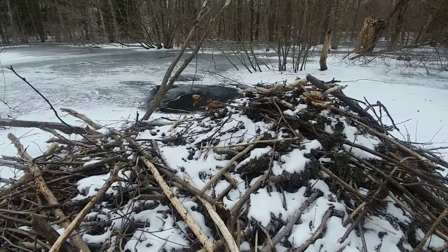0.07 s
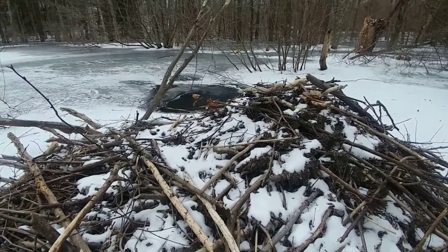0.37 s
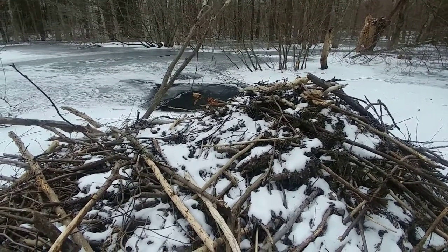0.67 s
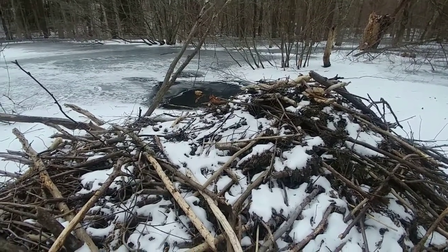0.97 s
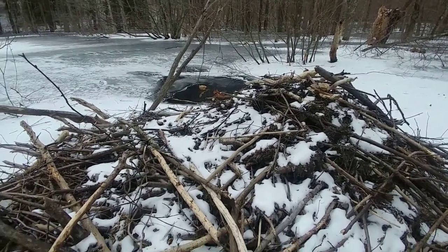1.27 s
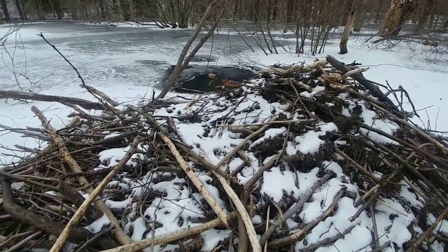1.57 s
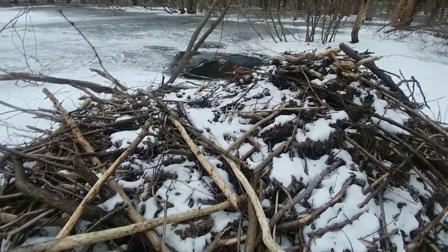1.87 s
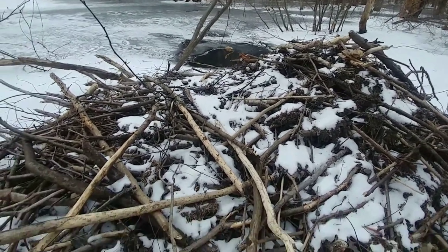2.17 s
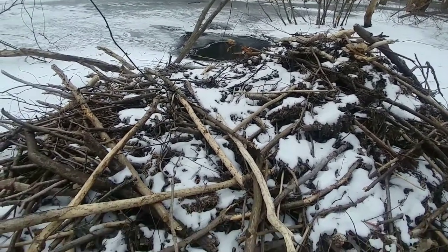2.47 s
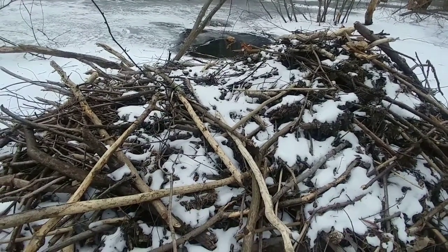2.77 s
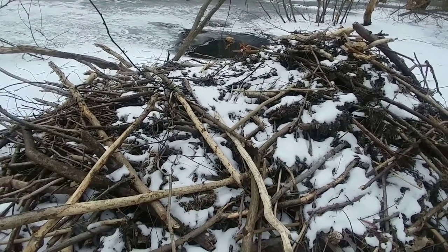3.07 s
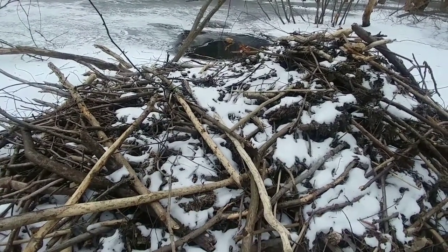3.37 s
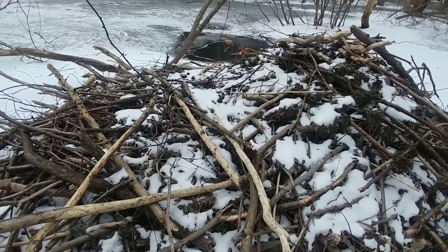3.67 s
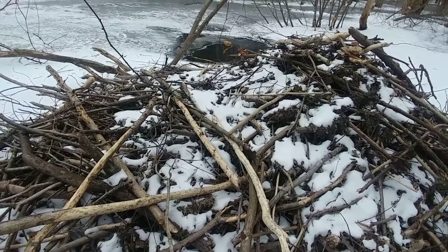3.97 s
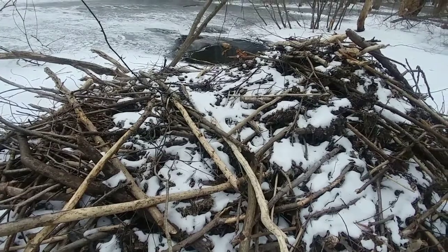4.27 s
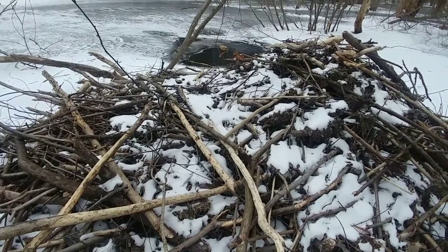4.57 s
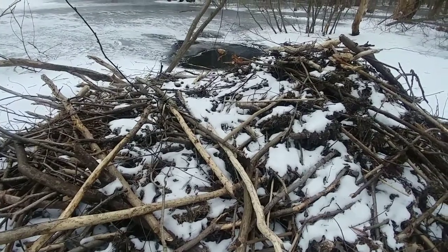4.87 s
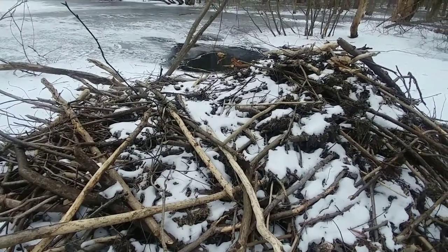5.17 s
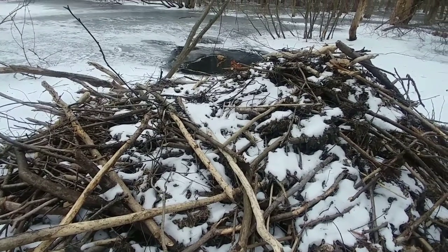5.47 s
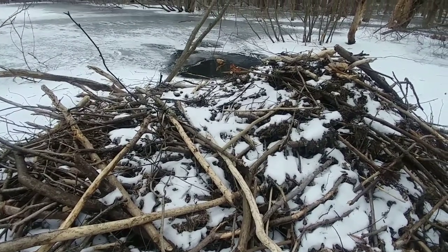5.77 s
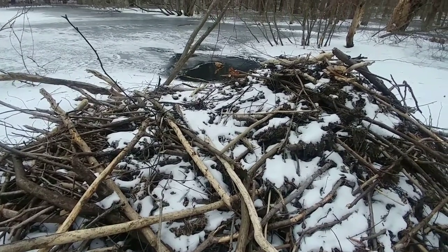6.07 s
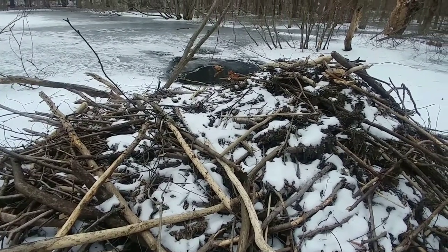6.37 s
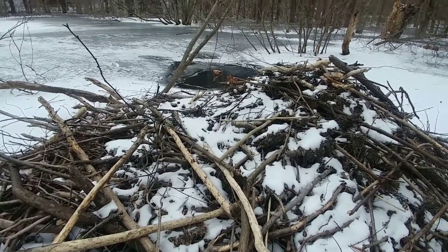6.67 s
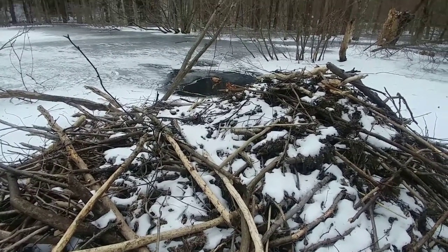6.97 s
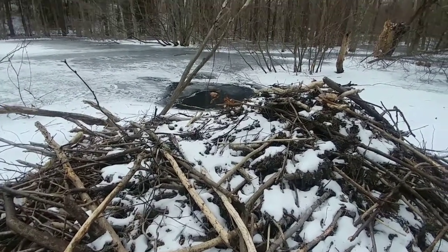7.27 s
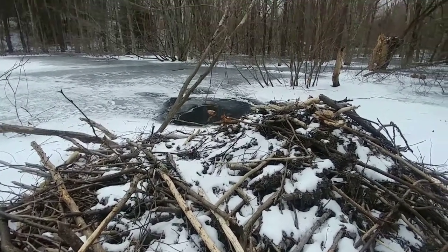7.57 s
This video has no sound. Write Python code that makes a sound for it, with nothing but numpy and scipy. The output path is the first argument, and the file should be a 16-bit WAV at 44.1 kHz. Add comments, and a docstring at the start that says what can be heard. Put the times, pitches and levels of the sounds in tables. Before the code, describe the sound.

A beaver gnaws wood inside its stick lodge, heard from a few steps outside on a still winter day. The chewing starts at once, about five bites a second. Each bite is a short crunch that begins as a scrape and ends as a dull knock, often with a sharper snap of thick fibres, all hollow and muffled by the wall. The gnawing eases briefly around 1 second, just after 2 seconds and from about 3.5 to 4 seconds, then runs on steadily. A cluster of sharper cracks stands out at about 6 seconds. After that the bites are softer and sparser, with one more snap near 7.4 seconds and a last light bite around 7.5. A few faint twig ticks fall near 0.7, 1.1 and 4.2 seconds. A faint low rumble and thin hiss of open air continue throughout.

```python
"""Beaver gnawing in a winter lodge

A beaver chews wood inside its stick lodge on a frozen pond, about five bites a second. Each bite
tears a run of fibres and thick ones snap; the cracks ring branch and chamber and come out muffled
by sticks, mud and snow. Outside, a few twigs tick over the faint rumble and hiss of a still day."""
import sys
import numpy as np
from scipy import signal
from scipy.fft import rfft, irfft
from scipy.io import wavfile
from scipy.ndimage import uniform_filter1d

SR = 44100
rng = np.random.default_rng(int(sys.argv[2]) if len(sys.argv) > 2 else 0)


def store_wav(level_fs):
    """Save 16-bit WAV to argv[1]."""
    pcm = np.round(np.clip(np.atleast_2d(level_fs), -1, 1) * 32767)
    wavfile.write(sys.argv[1], SR, pcm.T.astype(np.int16))


N = 344862
SIZE, LEAD = 16384, 128  # one event's buffer and the pre-roll of a ring [samples]
HZ = np.arange(SIZE // 2 + 1) * SR / SIZE
TIME = np.arange(N) / SR

# tone of the open air: (frequency [Hz], relative spectral level [dB])
AIR_SPECTRUM = [(20, -24.5), (40, -9.5), (60, 2), (100, -3), (160, -11), (300, -16), (630, -20.5),
                (1000, -26.5), (2000, -32), (4000, -33), (8000, -39.5), (15500, -39)]
# fader ride of a far-off drone: (time [s], level [dB])
DRONE_LEVELS = [(0, -81), (3.8, -86), (4.9, -70), (7.8, -70.5)]
# soft swells over the steady hiss: (time [s], level [dB])
HISS_SWELLS = [(4.28, -73.5), (4.87, -76), (7.32, -78.5)]
# twigs settling outside: (time [s], peak level [dB], pitch [Hz], width per filter pass [Hz])
TWIG_TICKS = [(0.707, -47.5, 5650, 900), (1.123, -55, 3800, 600), (1.677, -38, 250, 513),
              (4.175, -49, 3760, 500)]
# resonances of branch and chamber, heard through the wall:
# (frequency [Hz], width [Hz], relative level [dB], left minus right [dB])
LODGE_MODES = [(63, 21, -0.5, -1), (109, 51, -16, 7), (202.3, 47, -5.5, -1.5), (431.6, 83, -5.5, 1),
               (564, 120, -3.5, 3.5), (648, 61, 1, -1), (880, 130, -2.5, 0.5), (1068, 246, -4.5, 5),
               (1291, 200, -10, -1.5), (1547, 220, -11.5, 14), (1768, 125, -3, 1.5), (2077, 130, -6.5, 0),
               (2348, 227, -11, -13), (2560, 380, -20, -11), (2988, 220, -13.5, -4.5),
               (3670, 280, -30.5, 12), (3900, 720, -29.5, 1.5), (4850, 680, -34, -1.5),
               (6160, 1300, -34.5, -2), (7500, 530, -36.5, -6), (8590, 410, -31, 7.5),
               (8840, 510, -35.5, 8), (13500, 3800, -54, -3.5)]
# the grain changes slowly as the teeth work along the branch:
# (time [s], base crack rate [1/s], hollowness [dB], crispness [dB])
WOOD_GRAIN = [(0, 291, 2.5, 6), (1.5, 207, -0.5, 4.5), (3.1, 302, 2, -2), (4.1, 119.4, -1, -2),
              (5.1, 188, -3, 3), (5.501, 140, -4, 0), (6.1, 285, -5.5, 3.5), (7.6, 274, -5, 3)]
# strokes of the teeth: (time of full force [s], length [s], level [dB], brightness [dB])
BITE_STROKES = [(0.033, 0.082, -34, -6.5), (0.225, .08, -37, -6.5), (0.428, 0.089, -36, -7),
                (.642, 0.082, -37, -1.5), (0.847, 0.072, -37, -7), (1.199, 0.078, -56.5, -1),
                (1.363, .05, -42, -5.5), (1.404, 0.077, -43, -5), (1.6, 0.096, -36.5, -4),
                (1.808, 0.12, -35, -5.5), (2.008, 0.066, -50.5, 0), (2.166, 0.051, -63, 9),
                (2.359, .098, -41, -4), (2.56, 0.073, -33.5, -5.5), (2.74, 0.065, -37, -1.5),
                (2.939, .09, -33, 1), (3.004, 0.062, -47.5, -2), (3.219, 0.092, -34, -2),
                (3.424, 0.067, -32, 0), (3.671, 0.072, -50.5, -3.5), (4.004, .04, -40.5, -0.5),
                (4.059, 0.084, -42, -3.5), (4.26, 0.083, -39.5, -1), (4.427, 0.056, -50.5, 4.5),
                (4.478, 0.082, -38.5, 4), (4.655, 0.062, -42, -5.5), (4.803, 0.024, -42, -10),
                (4.858, 0.097, -41, 0.5), (5.042, 0.069, -36, -1.5), (5.102, 0.08, -34.5, -5.5),
                (5.286, 0.063, -35.5, -4.5), (5.478, 0.026, -56.5, -4), (5.512, 0.032, -42, -3),
                (5.552, 0.043, -42, -1), (5.753, 0.08, -42.5, -4.5), (6.054, 0.13, -57, -5),
                (6.274, 0.082, -46, -6), (6.479, 0.025, -52, -5.5), (6.659, 0.063, -48, 1),
                (7, 0.043, -46, -3), (7.156, 0.066, -48.5, 1.5), (7.358, 0.079, -46.5, -2.5),
                (7.54, 0.084, -47.5, 0.5)]
# thick fibres breaking: (time [s], level [dB], brightness [dB])
FIBRE_SNAPS = [(.016, -39, 9), (0.0227, -32, 1), (.0311, -24.5, 9), (.214, -26, -4), (0.2748, -38, 2.5),
               (.42, -25.5, -9), (0.4803, -34.5, -3.5), (.632, -28, -5), (1.354, -33.5, -13),
               (1.392, -33.5, -20), (1.4305, -37.5, 1), (1.5883, -35, -13), (1.6028, -20.5, 1),
               (1.783, -34, 10), (1.791, -29.5, -11), (1.8015, -25, 2), (2.343, -33, 17),
               (2.5583, -27.5, 16), (2.5635, -23, 5), (2.938, -28, -10), (3.025, -28, 16), (3.197, -35, 3),
               (3.222, -23, 7), (4.0815, -35, 0), (4.4455, -28.5, -0.5), (4.8442, -31, -8),
               (5.017, -35.5, 10), (5.0395, -27, -5), (5.0588, -39, 14), (5.0707, -25, 6), (5.105, -31, 8),
               (5.2669, -29, -5), (5.5023, -37.5, -10), (5.54, -31.5, -5.5), (5.7338, -28.5, 4),
               (6.0261, -28.5, 7), (6.0379, -24, 6), (6.0549, -18.5, 12.5), (6.0824, -28, -6.5),
               (6.299, -32.5, -6), (7.3719, -31.5, 0)]


def amp(db):
    """Decibels to gain."""
    return 10 ** (np.asarray(db) / 20)


def unit(x):
    """Scale to rms 1."""
    return x / np.sqrt(np.mean(x ** 2))


def add(track, sound, at_s):
    """Mix a sound into a track, trimmed at the ends."""
    start = int(round(at_s * SR))
    lo, hi = max(start, 0), min(start + sound.shape[-1], N)
    track[..., lo:hi] += sound[..., lo - start:hi - start]


def bell(f, hz, width):
    """Gain of a resonance with steep skirts."""
    return 1 / (1 + (np.sqrt(2) - 1) * (2 * (f - hz) / width) ** 2)


def causal(gain):
    """Minimum-phase spectrum of a gain curve: a sharp attack, then the ring."""
    cepstrum = irfft(np.log(gain + 1e-9))
    cepstrum[1:SIZE // 2] *= 2
    cepstrum[SIZE // 2 + 1:] = 0
    return np.exp(rfft(cepstrum))


def noise(gain):
    """Noise of rms 1, coloured by a gain curve."""
    return unit(irfft(rfft(rng.standard_normal(N)) * gain, N))


def wander(rate_hz):
    """Slow random drift of rms 1."""
    hold = int(SR / rate_hz)
    steps = np.repeat(rng.standard_normal(N // hold + 1), hold)[:N]
    return unit(uniform_filter1d(uniform_filter1d(steps, hold), hold))


def winter_air(mid_db=-65, wander_db=1.0, widen_hz=900, steady_hiss_db=-82.5, swell_s=0.15):
    """The bed: a near-centred rumble, a distant drone and a thin, wide hiss."""
    f = np.arange(N // 2 + 1) * SR / N + 1
    hz, db = np.transpose(AIR_SPECTRUM)
    colour = amp(np.interp(np.log(f), np.log(hz), db))
    stereo_width = np.clip(0.36 + f / (f + widen_hz), 0, 1)
    mid = noise(colour)
    side = irfft(rfft(noise(colour)) * stereo_width, N)
    rumble = uniform_filter1d(mid, SR // 600)
    mid = mid + rumble * (amp(wander_db * wander(rate_hz=3.07)) - 1)  # only the lows drift
    air = amp(mid_db) * np.array([mid + side, mid - side])
    drone = amp(np.interp(TIME, *np.transpose(DRONE_LEVELS))) * noise(bell(f, hz=199, width=14))
    hiss = np.array([noise(bell(f, hz=8000, width=2500)) for _ in range(2)])
    swells = sum(amp(db) * np.exp(-((TIME - s) / swell_s) ** 2) for s, db in HISS_SWELLS)
    return air + drone + np.hypot(amp(steady_hiss_db), swells) * hiss


def twigs():
    """Settling twigs: lone, dry ticks, each a click passed twice through one resonance."""
    out = np.zeros(N)
    for s, db, hz, width in TWIG_TICKS:
        tick = irfft(causal(bell(HZ, hz, width) ** 2))
        add(out, amp(db) * tick / np.abs(tick).max(), s)
    return out


def lodge_ring(late_s=0.0016, late_hz=800, scatter_hz=3500, scatter_s=0.007, right_lag_s=0.00021):
    """Stereo ring of one crack: the lows get out late, the treble scatters among the sticks."""
    delay = late_s / (1 + (HZ / late_hz) ** 4)
    scattered = 0.9 / (1 + (scatter_hz / (HZ + 1)) ** 4)  # share of the power
    decay = np.exp(-np.arange(SIZE) / SR / scatter_s)
    hz, width, db, pan = np.transpose(LODGE_MODES)
    # every new grip on the branch nudges the resonances in pitch and level
    detune, level_nudge = rng.standard_normal((len(LODGE_MODES), 2)).T
    modes = bell(HZ, (hz * (1 + 0.011 * detune))[:, None], width[:, None]) ** 2
    channels = []
    for side, lag in ((1, 0), (-1, right_lag_s)):
        power = amp(db + 1.02 * level_nudge + side * pan / 2) ** 2 @ modes
        phase = 2 * np.pi * np.cumsum(delay + lag) * SR / SIZE
        direct = np.exp(-1j * (phase - phase[0]))
        sticks = rfft(unit(rng.standard_normal(SIZE) * decay)) / np.sqrt(SIZE)
        paths = np.sqrt(1 - scattered) * direct + np.sqrt(scattered) * sticks
        ring = irfft(causal(np.sqrt(power)) * paths)
        channels.append(np.roll(ring, LEAD)[:SIZE // 2])
    return unit(np.array(channels)) / np.sqrt(SIZE // 2)


def through_lodge(ring, wood):
    """Play dry wood through the lodge's stereo ring."""
    return signal.fftconvolve(wood[None], ring, axes=1)[:, LEAD:]


def grain_at(s):
    """Crack rate, hollowness and crispness of the wood under the teeth at this moment."""
    times, *columns = np.transpose(WOOD_GRAIN)
    return [np.interp(s, times, column) for column in columns]


def wood_tone(x, bright_db, hollow_db, crisp_db, thud_db):
    """EQ for the wood: the grip and the fibre's hardness decide which bands take the energy."""
    tilt_db = bright_db / 2
    hz = [110, 520, 1080, 2000, 3100, 5000]
    db = [thud_db, -tilt_db, hollow_db, tilt_db, tilt_db - 0.21 * crisp_db, tilt_db + crisp_db]
    gain = amp(np.interp(np.log(HZ + 1), np.log(hz), db))
    midrange_gain = np.sqrt(np.mean(amp(db[1:4]) ** 2))
    return irfft(rfft(x, SIZE) * causal(gain)) / midrange_gain


def fibre_snap(splinter_db=-3.5, splinter_s=0.0022):
    """One clean break, then a short spray of splinters; energy 1."""
    size = SIZE // 16
    decay = np.exp(-np.arange(size) / SR / splinter_s)
    snap = amp(splinter_db) * unit(rng.standard_normal(size) * decay)
    snap[0] += np.sqrt(size)  # the break itself
    return unit(snap) / np.sqrt(size)


def letting_go(x, length_s, dull_db=4, split_hz=800):
    """Tension drains from the fibres: a bite starts as a bright scrape and ends as a dull knock."""
    progress = np.clip((np.arange(SIZE) - SIZE // 2) / SR / length_s, -1, 1)
    low = irfft(rfft(x) / (1 + (HZ / split_hz) ** 4))
    return low * amp(dull_db * progress) + (x - low) * amp(-dull_db * progress)


def bite(length_s, rate, attack_share=0.49, spread_db=3.0, splinter_db=-1, splinter_s=0.0024):
    """Incisors stick and slip through the grain; the faster they slip, the more tiny fibres crumble."""
    t = (np.arange(SIZE) - SIZE // 2) / SR  # full force falls mid-buffer
    attack_s, release_s = attack_share * length_s, (1 - attack_share) * length_s
    force = 0.1 ** np.where(t < 0, np.abs(t / attack_s) ** 3, np.abs(t / release_s) ** 2.3)
    gap_jitter, level_jitter = rng.standard_normal((300, 2)).T
    onsets = (np.cumsum(np.exp(0.4 * gap_jitter)) * SR / rate).astype(int)
    inside = onsets < SIZE
    cracks = np.bincount(onsets[inside], amp(spread_db * level_jitter[inside]), SIZE)
    # every crack trails its own spray of splinters
    tails = signal.lfilter([1], [1, -np.exp(-1 / SR / splinter_s)], cracks)
    spray = amp(splinter_db) * unit(tails * rng.standard_normal(SIZE))
    crumbs = rng.standard_normal(SIZE) * (rng.random(SIZE) < 0.1)
    crumb_gain = amp(-4) * rate / 330
    tearing = unit(cracks - cracks.mean()) + spray + crumb_gain * unit(crumbs)
    return unit(force * tearing) * np.sqrt(np.mean(force ** 2))


def beaver(stick_s=0.09, firm_bite_db=-38, tug=0.93, snap_s=0.0026):
    """The lead: crunching bites and snapping fibres, all ringing the same lodge."""
    out = np.zeros((2, N))
    rings = [lodge_ring() for _ in BITE_STROKES]
    for ring, (s, length_s, db, bright_db) in zip(rings, BITE_STROKES):
        rate, hollow_db, crisp_db = grain_at(s)
        rate /= max(1, length_s / stick_s) ** 2  # in a long bite the teeth stick and cracks thin out
        tearing = letting_go(bite(length_s, rate), length_s)
        # even a light bite tugs at the branch, so the thud varies less than the crunch
        crunch = wood_tone(tearing, bright_db, hollow_db, crisp_db, thud_db=tug * (firm_bite_db - db))
        add(out, amp(db) * through_lodge(ring, crunch), s - SIZE / 2 / SR)
    snap_gain = np.sqrt(snap_s * SR)  # a snap packs the energy of snap_s at its level
    for s, db, bright_db in FIBRE_SNAPS:
        nearest_bite = np.argmin([abs(stroke[0] - s) for stroke in BITE_STROKES])
        _, hollow_db, crisp_db = grain_at(s)
        snap = wood_tone(fibre_snap(), bright_db, hollow_db + 4, crisp_db - 2, thud_db=-9)
        add(out, amp(db) * snap_gain * through_lodge(rings[nearest_bite], snap), s)
    return out


def scene():
    """The lodge from a few steps away."""
    return beaver() + twigs() + winter_air()


def record(dry):
    """A steep high cut at 15.75 kHz on the whole mix."""
    return signal.sosfilt(signal.ellip(10, 0.1, 70, 15750, fs=SR, output="sos"), dry)


dry = scene()
out = record(dry)
store_wav(out)
```